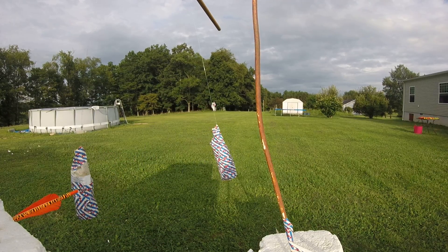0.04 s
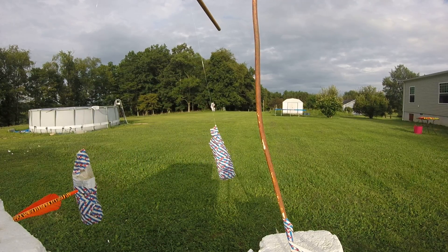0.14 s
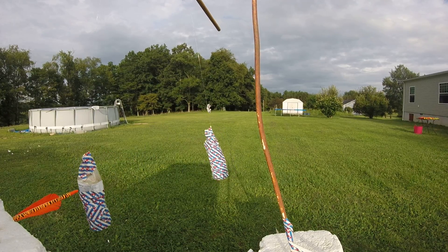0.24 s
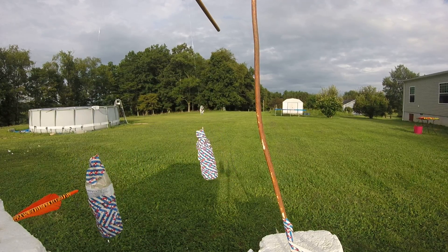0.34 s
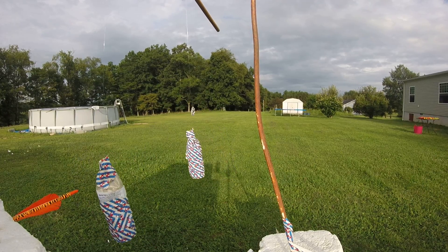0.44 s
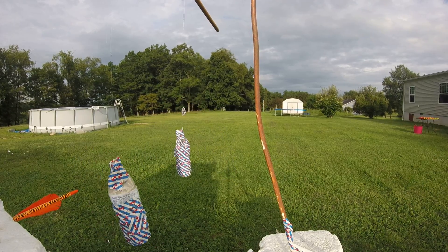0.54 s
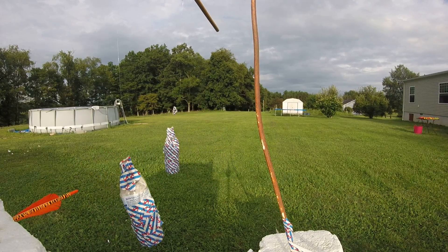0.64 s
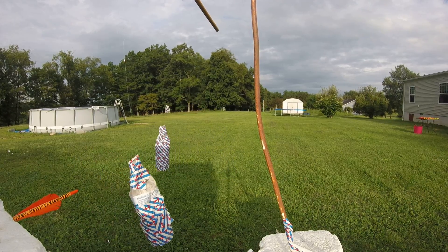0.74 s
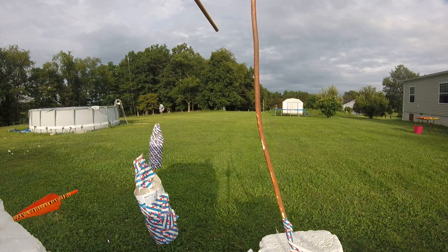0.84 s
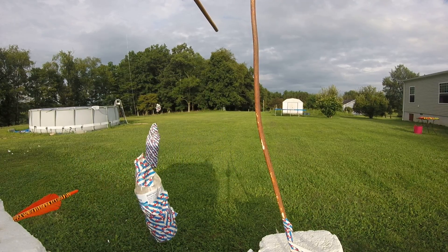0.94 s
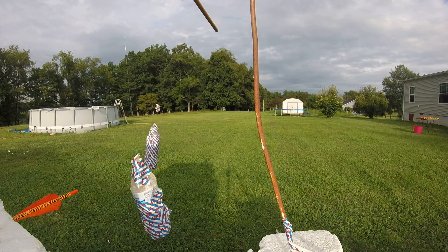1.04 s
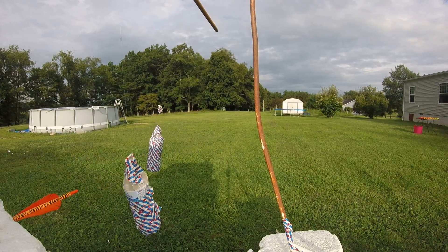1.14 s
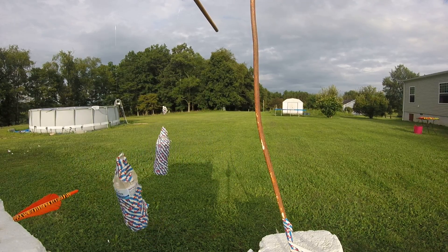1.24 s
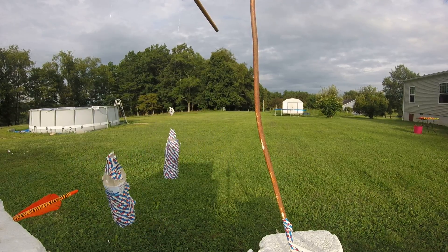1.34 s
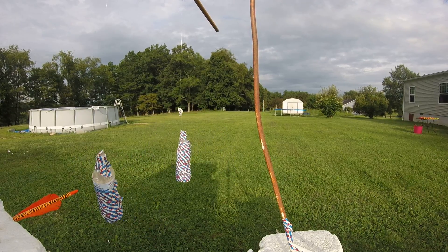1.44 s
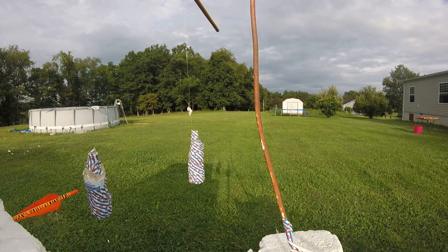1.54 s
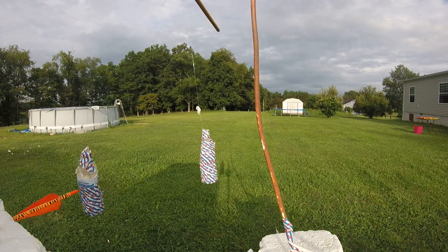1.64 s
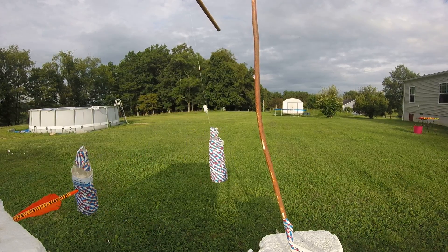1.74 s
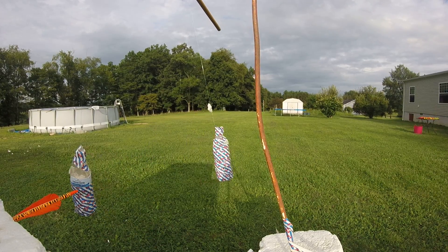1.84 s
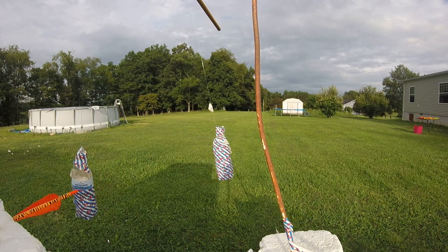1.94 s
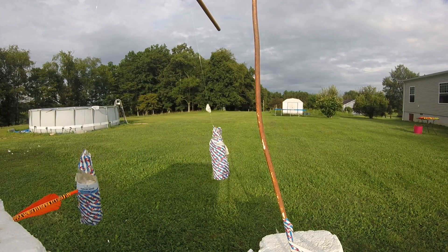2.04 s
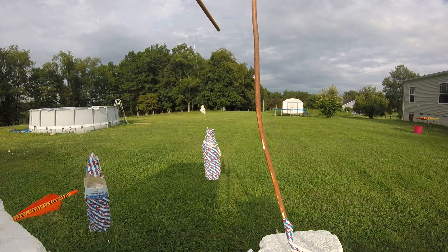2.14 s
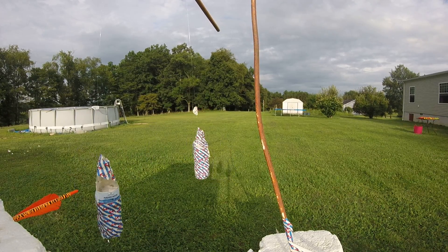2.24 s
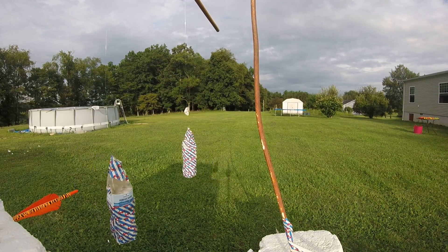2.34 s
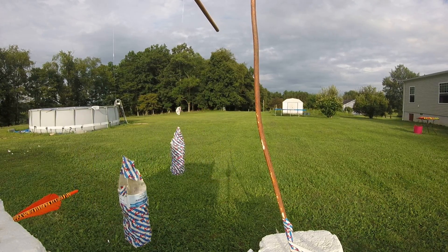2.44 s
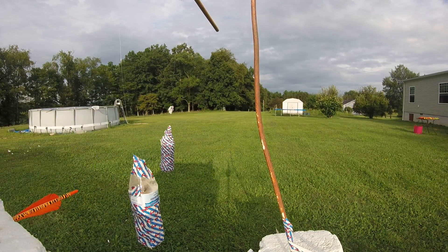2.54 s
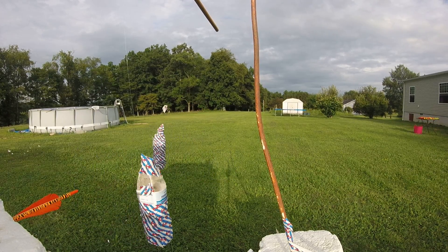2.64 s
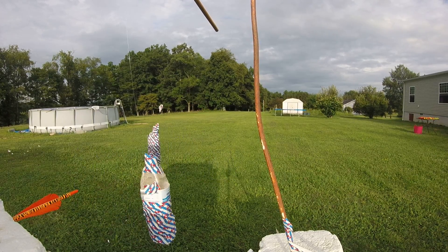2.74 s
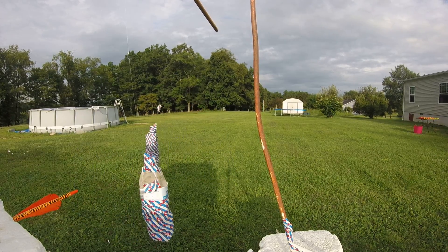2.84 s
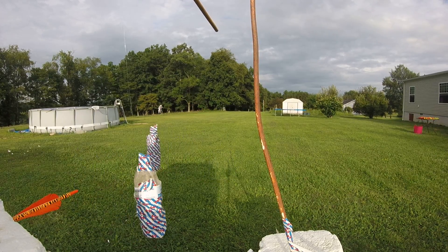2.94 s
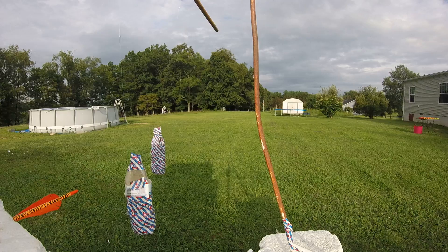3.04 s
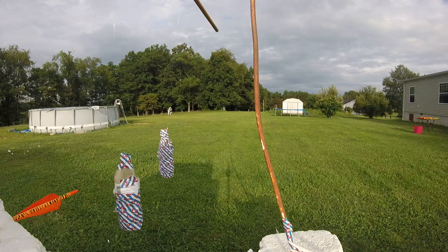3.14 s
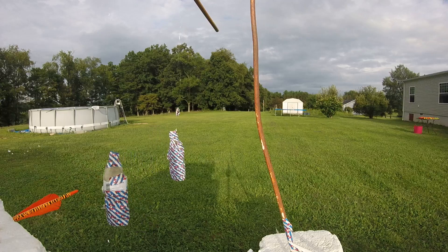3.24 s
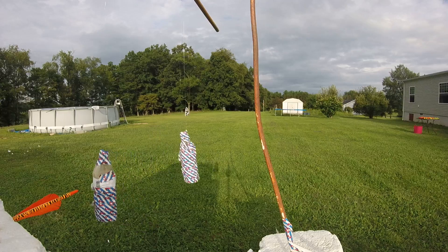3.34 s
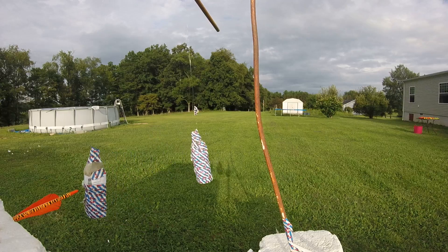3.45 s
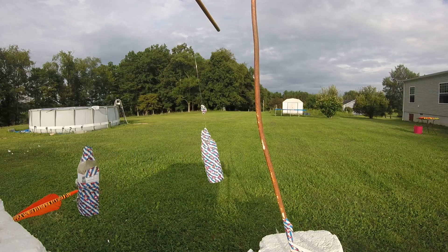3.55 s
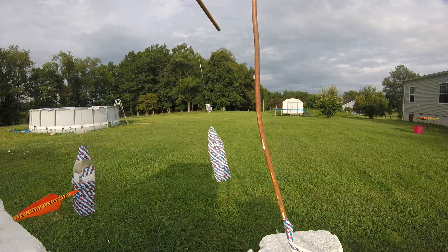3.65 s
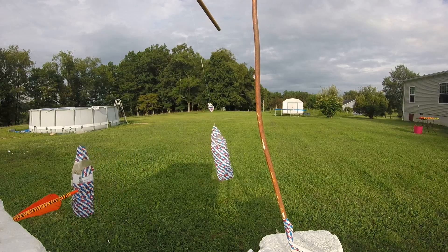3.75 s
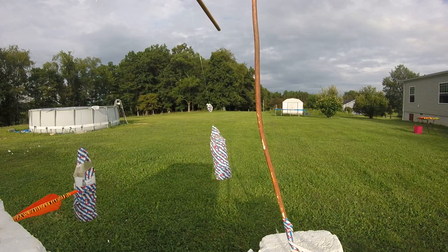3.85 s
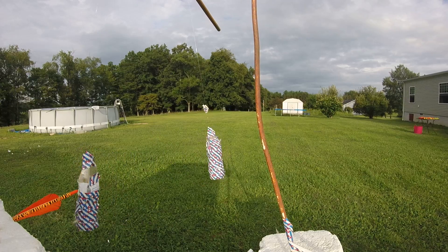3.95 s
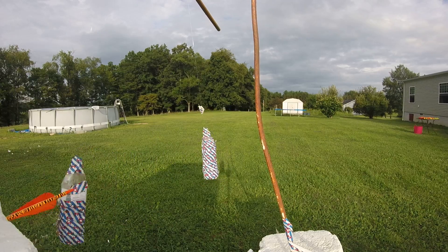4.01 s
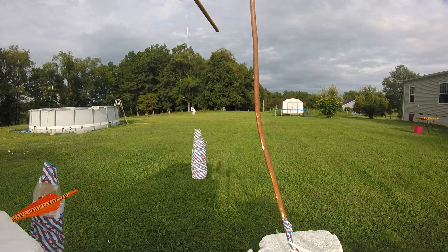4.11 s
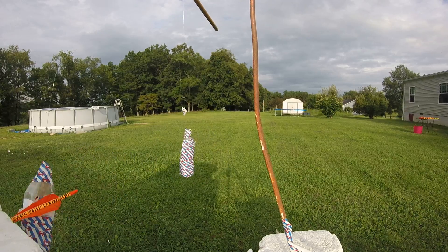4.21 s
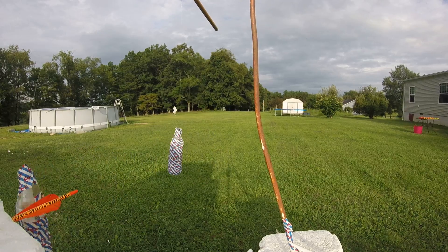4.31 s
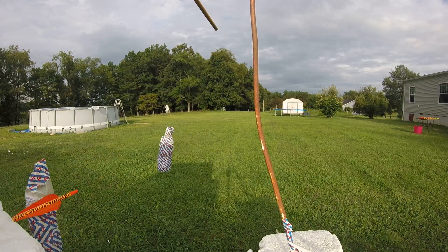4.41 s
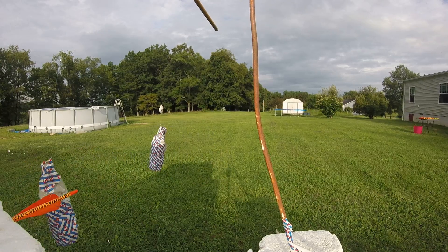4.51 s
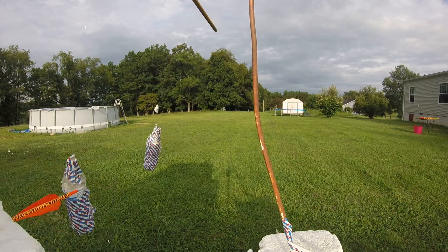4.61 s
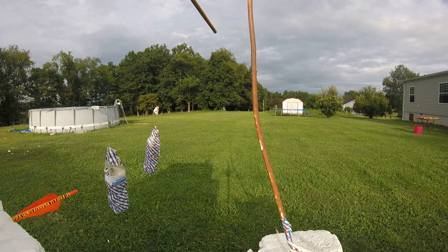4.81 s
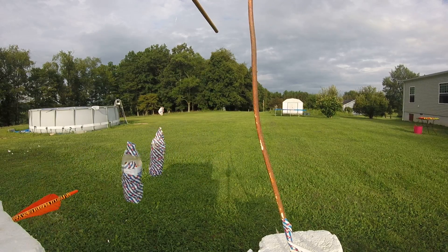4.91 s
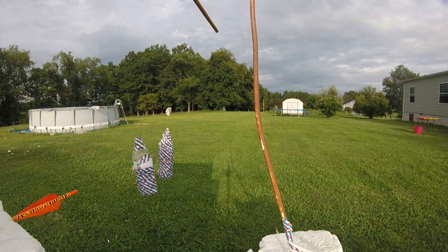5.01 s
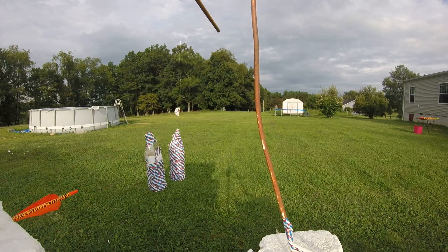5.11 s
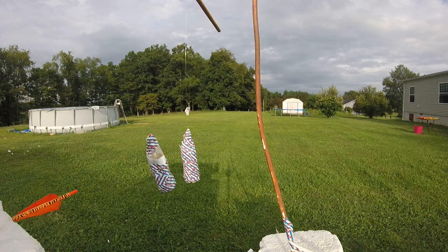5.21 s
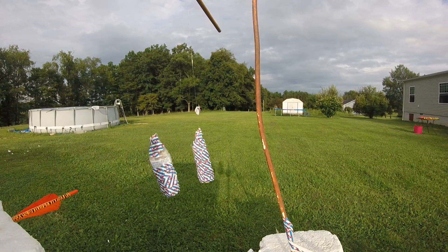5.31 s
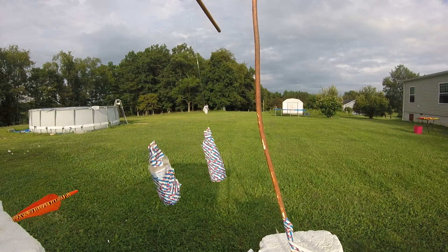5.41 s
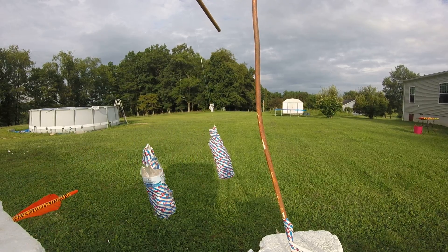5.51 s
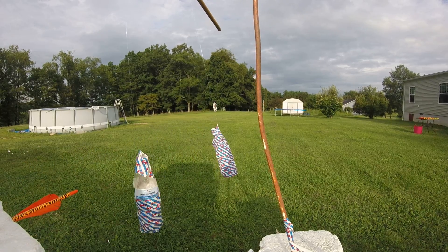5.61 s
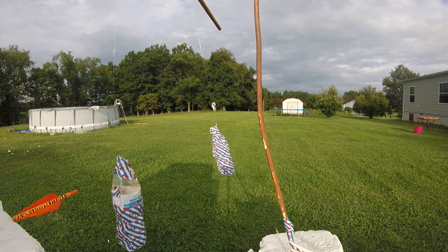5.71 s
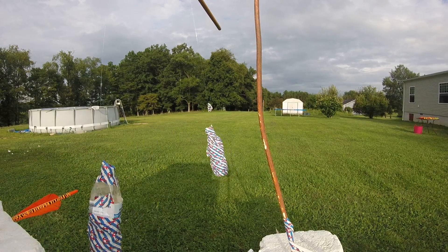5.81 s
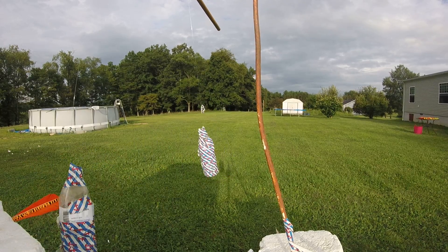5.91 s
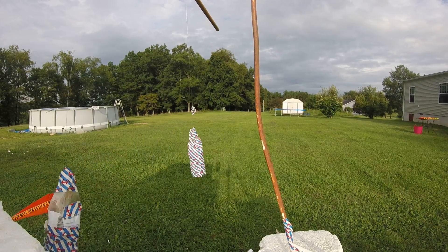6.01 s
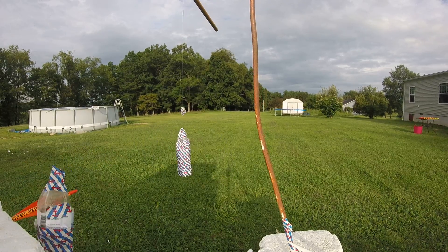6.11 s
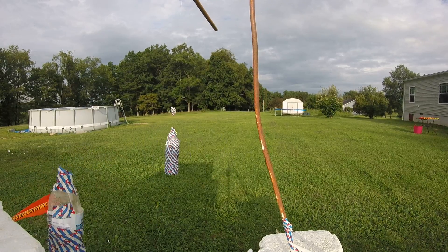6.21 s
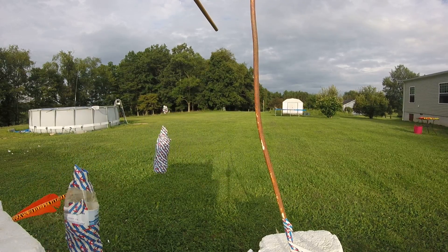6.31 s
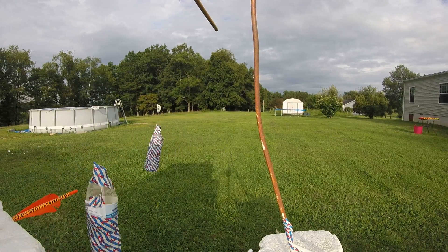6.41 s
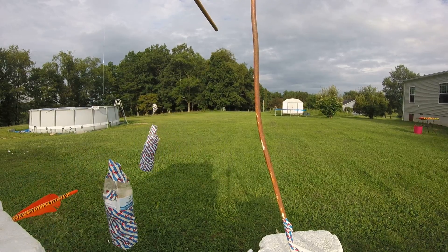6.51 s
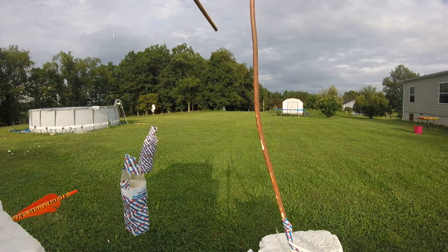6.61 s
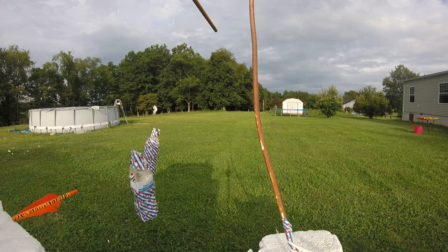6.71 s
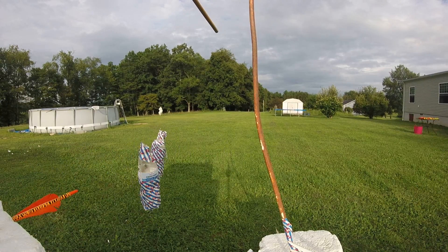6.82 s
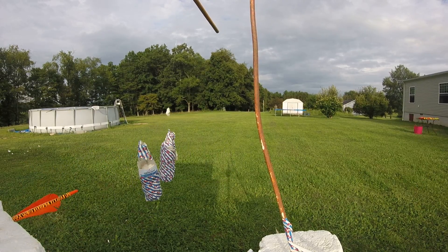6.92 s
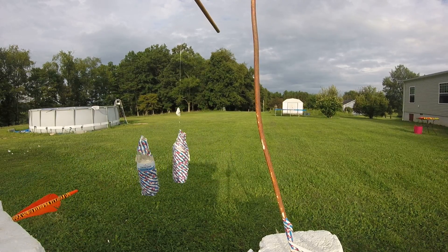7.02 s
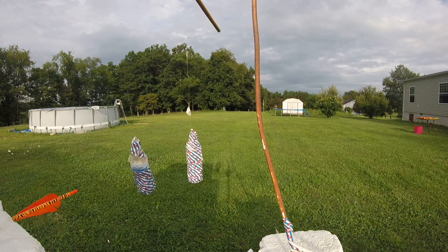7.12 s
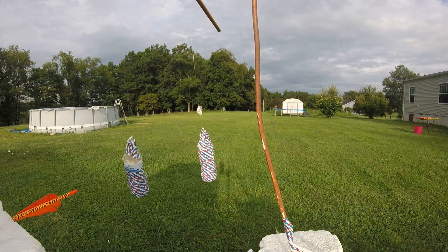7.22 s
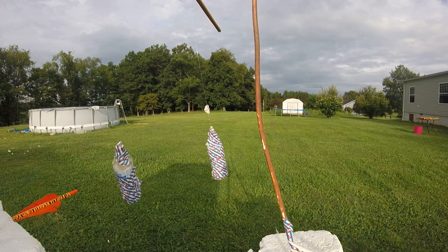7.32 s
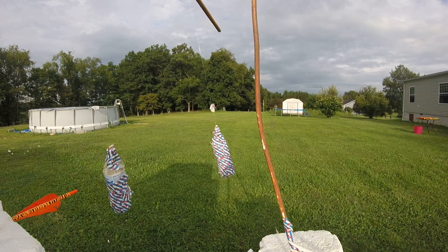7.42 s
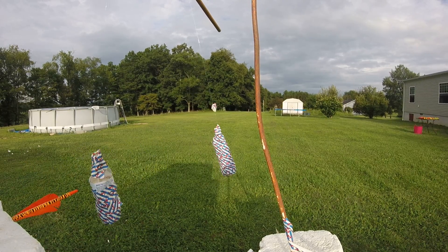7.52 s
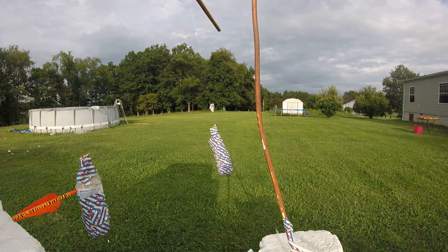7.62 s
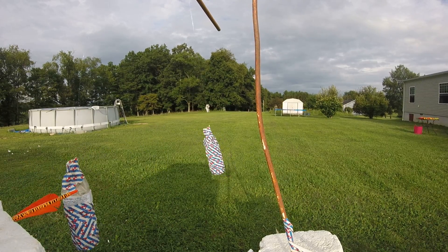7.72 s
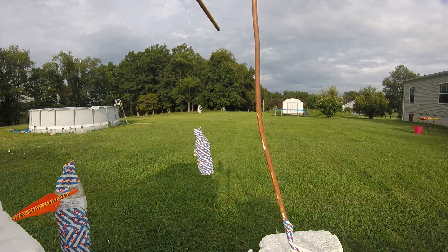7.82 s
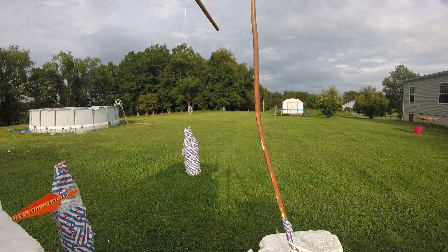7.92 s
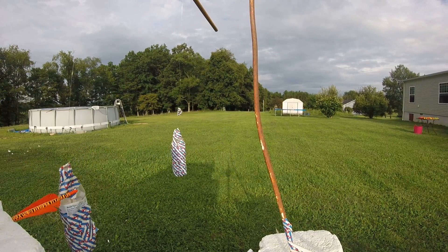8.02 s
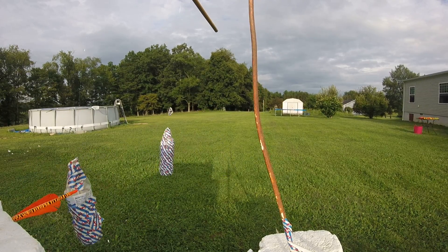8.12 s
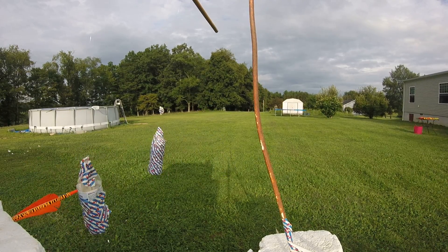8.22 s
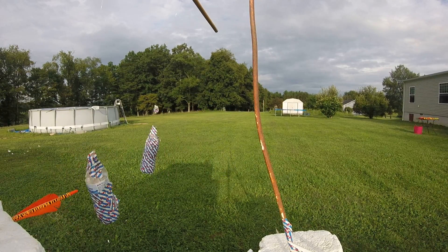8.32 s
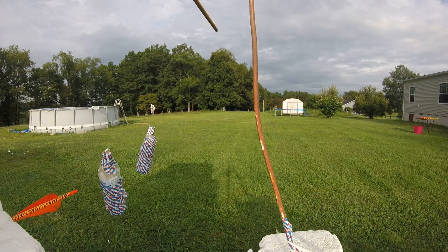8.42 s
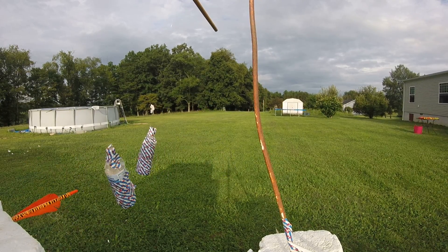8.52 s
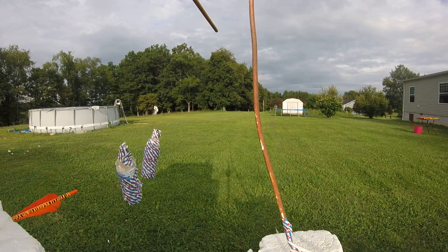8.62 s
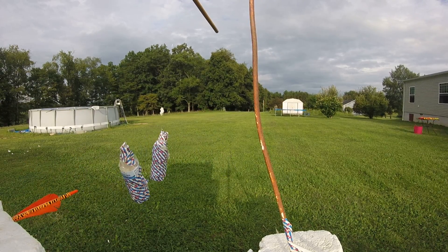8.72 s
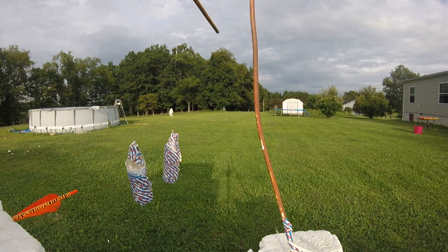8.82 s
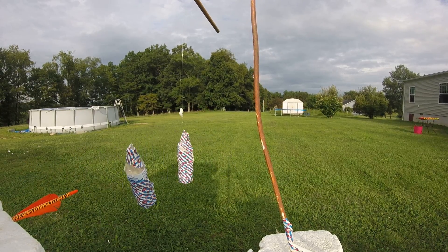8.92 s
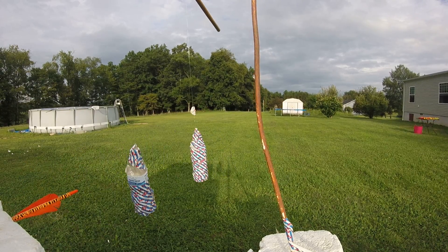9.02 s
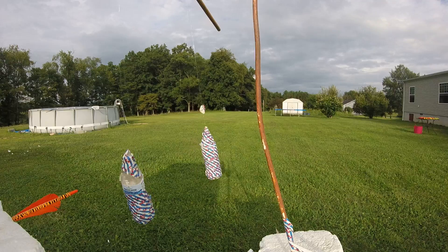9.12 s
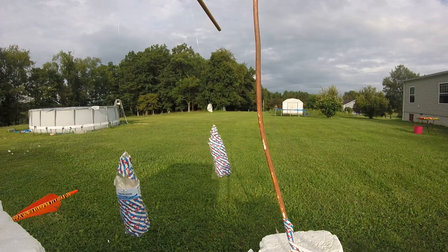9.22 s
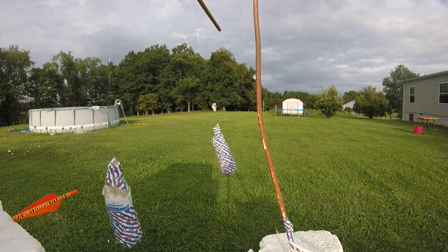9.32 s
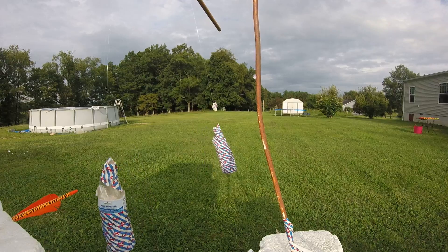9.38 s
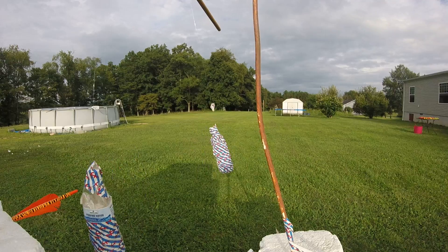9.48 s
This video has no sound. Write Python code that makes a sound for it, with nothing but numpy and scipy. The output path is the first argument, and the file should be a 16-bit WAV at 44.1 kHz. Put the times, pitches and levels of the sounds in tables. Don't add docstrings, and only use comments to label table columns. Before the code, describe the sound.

In a quiet backyard with crickets and a distant engine, an arrow smacks a hanging plastic bottle sharply; later a dull bump and two knocks.

```python
import sys
import numpy as np
from scipy import signal
from scipy.fft import rfft, irfft, next_fast_len
from scipy.io import wavfile
from scipy.ndimage import map_coordinates

SR = 44100
rng = np.random.default_rng(int(sys.argv[2]) if len(sys.argv) > 2 else 0)


def invert_db(level):
    return 10 ** (np.asarray(level, dtype=float) / 20)


def to_wav(s):
    ch = np.atleast_2d(s).T
    pcm = np.round(np.clip(ch, -1, 1) * 32767)
    wavfile.write(sys.argv[1], SR, pcm.astype(np.int16))


N = 421155


def unit(x):
    return x / np.sqrt(np.mean(x ** 2) + 1e-20)


def along(points, hz):
    point_hz, value = np.transpose(points)
    return np.interp(np.log(hz + 1), np.log(point_hz + 1), value)


def curves(rows, outside=None):
    time_s, *columns = np.transpose(rows)
    return [np.interp(np.arange(N) / SR, time_s, c, outside, outside) for c in columns]


def wobble(rate):
    knots = rng.standard_normal(int(N * rate / SR) + 4)
    return map_coordinates(knots, [np.arange(N) * rate / SR])


def filtered(x, response):
    m = next_fast_len(N + SR // 2)
    return irfft(rfft(x, m) * response(np.fft.rfftfreq(m, 1 / SR)), m)[..., :N]


def bandpass(f, centre_hz, width_hz):
    damping = 1j * f * width_hz
    return damping / (centre_hz ** 2 - f * f + damping)


def resonances(modes):
    top_hz = 2.0 * max(modes)[0]

    def response(f):
        total = sum(invert_db(db) * bandpass(f, centre, width) for centre, width, db in modes)
        return total / (1 + 1j * f / top_hz) ** 2
    return response


def noise(spectrum):
    return unit(filtered(rng.standard_normal(N), lambda hz: invert_db(along(spectrum, hz))))


# frequency_hz, density_db [dB per Hz]
BUFFET_SPECTRUM = [(10, -25), (25, -4.5), (60, -3.5), (120, -6), (200, -17), (350, -45), (600, -68.5)]
# centre_s, half_length_s, level_db
GUSTS = [(1.2, .5, -60.5), (1.8, 0.13, -48.5), (2.8, 0.53, -58.5), (3.783, 0.11, -57.5),
         (4.895, 0.087, -57), (7.03, 0.066, -46.5), (7.305, 0.15, -43.5), (7.79, 0.066, -42.5),
         (7.997, 0.12, -48.5), (8.407, 0.06, -49.5), (9.0, 0.06, -49), (9.409, 0.086, -46.5)]


def wind():
    t = np.arange(N) / SR
    level = invert_db(-58)
    for centre, half, db in GUSTS:
        level = level + invert_db(db) * np.exp(-((t - centre) / half) ** 2)
    lumpy = unit(invert_db(2.2 * wobble(18)) * noise(BUFFET_SPECTRUM))
    return level * invert_db(8.0) * lumpy


# frequency_hz, density_db [dB per Hz]
TRAFFIC_SPECTRUM = [(60, -20), (110, 9), (170, 3.5), (300, -1.5), (420, -7.5), (700, -4), (900, -11.5),
                    (1200, -28), (2000, -61)]
# time_s, level_db
TRAFFIC_LEVEL = [(0, -47.5), (.5, -45.5), (1.6, -46.5), (2.7, -52), (4, -51.5), (5.5, -54), (7.5, -51.5),
                 (8.1, -50.5), (8.6, -51.5), (9.55, -51.5)]


def traffic():
    level_db = curves(TRAFFIC_LEVEL)[0]
    return invert_db(level_db + 2.5 + 0.85 * wobble(6.4)) * noise(TRAFFIC_SPECTRUM)


# frequency_hz, density_db [dB per Hz]
HISS_SPECTRUM = [(500, -2), (1100, 3.5), (1500, 0.5), (2100, 0.5), (2800, -5), (3800, -8), (4800, -7),
                 (5800, -9), (6800, -8.5), (8000, -16.5), (11000, -23), (14500, -27), (16500, -47)]


def leaves():
    change_db = curves(TRAFFIC_LEVEL)[0] + 52
    level_db = -59 + 0.18 * change_db
    return invert_db(level_db + 1.5 + 0.35 * wobble(9)) * noise(HISS_SPECTRUM)


# time_s, firing_hz, level_db
ENGINE_PASSAGES = [
    [(0.0, 126.3, -35), (0.13, 124.9, -51.5), (0.3, 123.9, -52), (0.36, 122.4, -35.5), (0.98, 121.5, -38.5),
     (1.1, 121, -34), (1.8, 117.4, -30.5), (2.06, 105.6, -39.5), (2.16, 103, -54)],
    [(7.9, 111.7, -52), (8.0, 116, -41), (8.116, 117.7, -34), (8.298, 123.8, -39), (8.8, 134.2, -44),
     (8.89, 140.1, -53), (9.01, 140.5, -38.5), (9.07, 142.3, -51), (9.3, 141.4, -48)],
]
# start_s, end_s, start_hz, end_hz, level_db
DRONES = [(0, 0.42, 171.8, 173, -43.5), (.2, 1.6, 297, 278.6, -46), (0.5, 2.1, 374, 337, -52.5),
          (1, 1.94, 165, 152, -37), (0.999, 1.3, 150, 150.3, -49), (1.099, 1.94, 246, 227, -46),
          (2.2, 2.41, 161.4, 159.7, -49), (2.55, 3.02, 162.4, 150, -46.5), (8.05, 8.6, 236, 258, -53.5),
          (2, 2.45, 250, 235, -50.5)]


def engine():
    out = np.zeros(N)
    drift_hz, swell_db = 3 * wobble(10), 2.0 * wobble(13)
    for rows in ENGINE_PASSAGES:
        firing_hz = curves(rows)[0]
        level_db = curves(rows, -120)[1]
        tone = np.sin(2 * np.pi * np.cumsum(firing_hz) / SR)
        out += np.sqrt(2) * invert_db(level_db + 1.2 * wobble(14)) * tone
    for k, (start, end, hz0, hz1, db) in enumerate(DRONES):
        u = np.linspace(0, 1, round((end - start) * SR))
        drift, swell = (np.roll(v, k * SR)[:len(u)] for v in (drift_hz, swell_db))
        turns = np.cumsum(hz0 + (hz1 - hz0) * u + drift) / SR
        envelope = invert_db(db + swell) * np.sqrt(np.abs(np.sin(np.pi * u)))
        out[round(start * SR):][:len(u)] += envelope * np.sin(2 * np.pi * turns)
    return out


# chirp_rate_hz, first_chirp_s, pitch_hz, sweep_hz, roughness_hz
CRICKETS = [
    (13.23, .008, 6760, 190, 330),
    (14.1, .026, 6400, -110, 200),
]
# start_s, end_s, level_db
SONGS = [
    [(-.2, 2.4, 0), (2.45, 4.2, -3.5), (4.55, 7.38, -1), (7.45, 9.7, -6)],
    [(-.2, 7.3, -5), (7.3, 7.9, -2), (7.9, 8.5, -4), (8.5, 9.7, -9)],
]


def crickets():
    out, t = np.zeros(N), np.arange(N) / SR
    chorus_db, fade_s = -67.5, .1
    for (rate, first, hz, sweep, rough), songs in zip(CRICKETS, SONGS):
        level = np.zeros(N)
        for start, end, db in songs:
            inside_s = np.minimum(t - start, end - t)
            level += invert_db(chorus_db + db) * np.clip(inside_s / fade_s + .5, 0, 1)
        beat = np.cos(2 * np.pi * rate * (t - first) + 0.09 * wobble(7.9))
        phase = 2 * np.pi * np.cumsum(hz + sweep * beat) / SR
        band = (1.4 + wobble(2 * rough)) * np.sin(phase) + wobble(2 * rough) * np.cos(phase)
        pulses = invert_db(8 * np.tanh(2 * beat + .6) + .6 * wobble(12))
        out += level * unit(pulses * band)
    return out


# loudest_s, rise_s, t60_s, level_db,
# crackle_over_rub_db
RUSTLE = [(3.62, .012, 0.37, -48, -22), (3.7, .03, .6, -60.5, -14), (4.105, 0.47, .02, -55, -4),
          (4.14, .004, 0.17, -35, -1), (4.2, .04, 0.42, -44.5, -10), (4.3, 0.039, 0.29, -47, -13),
          (4.37, 0.04, 0.74, -50, -4), (4.5, 0.043, 0.35, -64, -6), (6.19, 0.014, 0.86, -50.5, -8),
          (6.37, .02, .6, -57, -12), (7.95, 0.0099, 0.076, -38, -20), (8.065, 0.071, 0.23, -45, -13),
          (8.15, .04, 0.34, -53, -9)]


def rustle():
    t = np.arange(-SR // 2, SR) / SR
    levels = np.zeros((2, N + SR))
    for s, rise, t60, db, over_db in RUSTLE:
        shape = np.clip(1 + t / rise, 0, 1) ** 2 * invert_db(-60 * np.maximum(t, 0) / t60)
        levels[:, round(s * SR) - SR // 2:][:, :len(t)] += invert_db([[db], [db + over_db]]) * shape
    rub, crackle = levels[:, :N]
    grains = rng.standard_normal((2, N)) * invert_db(5 * np.tanh(.6 * wobble(160)))
    body = resonances([(380, 205, 0.2), (684, 460, 1.0), (2030, 220, 2.5), (3260, 450, -9)])
    top = resonances([(5340, 1400, 4), (6700, 1000, 8), (9500, 2500, -10)])
    return rub * unit(filtered(grains[0], body)) + crackle * unit(filtered(grains[1], top))


# time_s, pitch_hz, peak_db
TICKS = [(4.1357, 10400, -13), (4.3, 1960, -38), (4.351, 5600, -30), (4.4424, 1100, -42),
         (4.4647, 8030, -36), (4.745, 9500, -54), (4.8068, 10000, -31.5), (6.185, 6300, -42),
         (6.192, 4000, -40), (6.365, 1300, -37), (6.426, 3600, -46), (8.0302, 10500, -38),
         (8.0952, 4900, -27), (8.108, 9500, -52), (8.154, 5840, -42), (8.166, 6000, -47),
         (8.188, 5500, -44)]


def ticks():
    out, t = np.zeros(N), np.arange(SR // 100) / SR
    for s, hz, db in TICKS:
        decay = invert_db(db - 60 * t * hz / 16)
        attack = 1 - np.exp(-t * hz / 1.2)
        out[round(s * SR):][:len(t)] += decay * attack * np.sin(2 * np.pi * hz * t)
    return out


def boom():
    t = np.arange(N) / SR - STRIKE[-4][0]
    low_modes = resonances([(310, 110, 9.0), (620, 260, -6)])
    shake = unit(filtered(rng.standard_normal(N), low_modes))
    t60_s = np.where(t > 0, .25, .04)
    return shake * invert_db(-31.5 - 60 * np.abs(t) / t60_s)


# time_s, strength_db, hardness_db, edge_db, weight_db
STRIKE = [(4.1261, -25, 7, 0, -25), (4.1266, -4.5, -1, 2, -17), (4.1355, -22, 4.5, 7, 13),
          (4.1368, -8.5, -8.5, 0, -17), (4.1406, -17, 3.5, -5, -3), (4.1438, -9, -12, -13, -6),
          (4.1474, -17, -4, -8, 2), (4.1505, -18, -18, -8, -1), (4.1537, -14.5, -21, 2, 10),
          (4.1572, -18, -20, -3, -21), (4.1630, -25.5, -18, -4, 15.5), (4.1717, -42, -5, -2, 7),
          (4.18, -42, 12, -10, 8), (4.2134, -53, 16, -4, 18)]
RATTLE = [(3.6172, -46, 7, -8, 2), (3.6875, -49, 2, -3, 2), (4.2914, -50, 9, -2, 14),
          (4.2996, -42, 8.5, -12, -14), (4.3144, -48, 7, 0, -5), (4.3404, -40, -3, 2, -8),
          (4.3505, -40, 2, 3, -13), (4.3693, -46, -1, -2, 11), (4.3914, -35.5, -4, -6, -18),
          (4.4094, -46, -8, 10, -7), (4.4273, -48.5, 4.5, 2, -2), (4.4424, -37.5, -9, -3, -3),
          (4.4944, -51, -6, 5, -7)]
BUMP = [
    (6.177, -35, -15, 3, 4),
    (6.1812, -45, -5, 3, 16),
    (6.184, -40.5, -2.5, 4, -23),
    (6.1916, -32.5, -5, -1.5, 4.5),
    (6.364, -36.5, -5, -6, -17),
    (6.369, -41, -10, -5, -15),
    (6.422, -41, -9, 4, -9),
]
KNOCKS = [(7.9375, -49, 2, -5, 14), (7.9443, -23, 11, -5.5, -21), (7.9483, -26.5, 2, -5, 4),
          (7.9523, -26, -21, 0, -16), (7.9636, -34, -10, 11.5, -11), (8.05, -32, 0, -6, -13),
          (8.0546, -19.5, 4, -1.5, -23), (8.0584, -24, 7, 0.5, -6), (8.0613, -21.5, 3, 0, 0),
          (8.095, -43, 23, 8, -4), (8.0969, -25, -20, 6, -1), (8.129, -35.5, 5.5, 5, -4),
          (8.167, -40, -7, 2, -3)]
# scrape_share, click_over_ring_db, bright_over_ring_db
TOUCH = [
    (0.34, -3.5, -10.5),
    (.8, -11, -9.5),
    (0.45, -3, -5.5),
    (0.24, -7, -10),
]
# centre_hz, width_hz, level_db
RING = [(1954, 293, 2.8), (2147, 130, 1.9)]
CLICK = [(1460, 116, -4), (3516, 260, 6), (4180, 135, 7)]
BRIGHT = [(4650, 307, 7), (5315, 890, 8.5), (6630, 670, 7.5), (9160, 1100, -13), (10900, 1400, -25)]
KNOCK = [(543, 170, -3.5), (694, 186, 4.5), (960, 510, -19)]
THUD = [(59, 45, -2.5), (165.7, 29, 4.5), (351, 130, -1), (440, 58, -4), (333, 14, -4.5)]


def half_wave(t, length_s):
    return np.sin(np.pi * np.clip(t / length_s, 0, 1)) ** 2 / (length_s * SR / 2)


def contacts():
    t = np.arange(SR // 20) / SR
    tap, knock, push = half_wave(t, .00025), half_wave(t, .0007), half_wave(t, .0016)
    drives = np.zeros((5, N + len(t)))
    for table, (scrape_share, click_db, bright_db) in zip([STRIKE, RATTLE, BUMP, KNOCKS], TOUCH):
        for s, db, hard_db, edge_db, weight_db in table:
            scrape = rng.standard_normal(len(t)) * np.exp(-t / 0.0017)
            blow = -np.exp(-t / .00005) + scrape_share * scrape
            blow /= np.linalg.norm(blow)
            click_share_db = click_db + 0.83 * hard_db + edge_db
            bright_share_db = bright_db + 0.97 * hard_db + edge_db
            shares_db = np.array([hard_db, click_share_db, bright_share_db, 0, weight_db])
            pushes = invert_db(db + shares_db)[:, None] * [-tap, blow, blow, -knock, -push]
            drives[:, round(s * SR):][:, :len(t)] += pushes
    gains_db = [30.75, 29.1, 24.8, 35.54, 40.0]
    groups = [RING, CLICK, BRIGHT, KNOCK, THUD]
    return sum(invert_db(g) * filtered(d, resonances(m)) for d, g, m in zip(drives, gains_db, groups))


# frequency_hz, t60_s
YARD = [(150, 0.51), (700, 0.4), (2500, 0.51), (9000, 0.29)]


def yard(x):
    hz, t, z = signal.stft(rng.standard_normal(SR // 2), SR, nperseg=256)
    decay = invert_db(-60 * t / along(YARD, hz)[:, None])
    tail = signal.istft(z * decay, SR, nperseg=256)[1]
    delayed = np.pad(x, (400, 0))
    return signal.fftconvolve(delayed, tail / np.linalg.norm(tail))[:N]


# centre_hz, width_hz, depth [0-1]
VALLEYS = [(1096, 110, 0.34), (2680, 630, 1), (4200, 370, 0.64), (8160, 730, 0.4)]


def housing(f):
    valleys = [1 - np.clip(depth, 0, 1) * bandpass(f, centre, width) for centre, width, depth in VALLEYS]
    return np.prod(valleys, axis=0) / (1 + 1j * f / 11000) ** 2


def recovery():
    start_s, dip_db, time_constant_s = 4, -3.5, 0.15
    u = np.maximum(np.arange(N) / SR - start_s, 0) / time_constant_s
    return invert_db(dip_db * np.e * u * np.exp(-u))


def scene():
    background = wind() + traffic() + leaves() + engine() + crickets()
    hits = contacts() + ticks()
    near = filtered(hits + invert_db(-30.0) * yard(hits) + rustle() + boom(), housing)
    return (near + recovery() * background)[None]


# time_s, gain_db
DUCK = [
    (4.104, -2),
    (4.112, -8.5),
    (4.1258, -12),
    (4.1262, -2.5),
]


def limiter(x):
    x = x * invert_db(curves(DUCK)[0])
    return x / (1 + np.abs(x) ** 8) ** (1 / 8)


def top_cut(x):
    return signal.sosfilt(signal.butter(12, 16540, fs=SR, output="sos"), x)


def record(dry):
    top_end = [(13000, 0.5), (15000, -3.5), (16300, -16), (16700, -64)]  # (Hz, dB)
    mix = filtered(limiter(dry), lambda hz: invert_db(along(top_end, hz)))
    return top_cut(mix)


dry = scene()
out = record(dry)
to_wav(out)
```